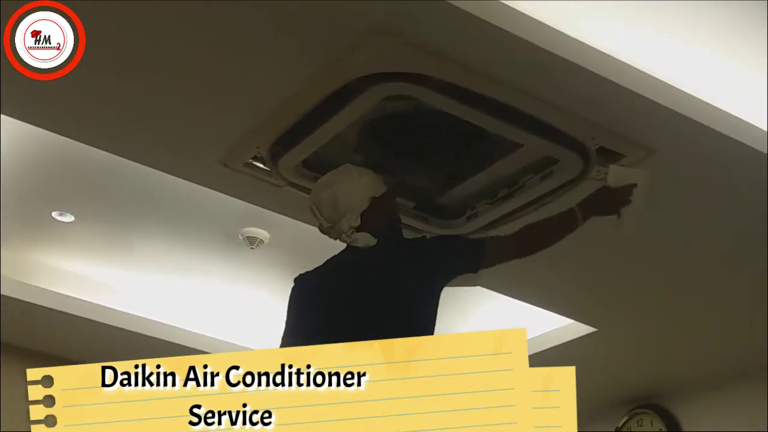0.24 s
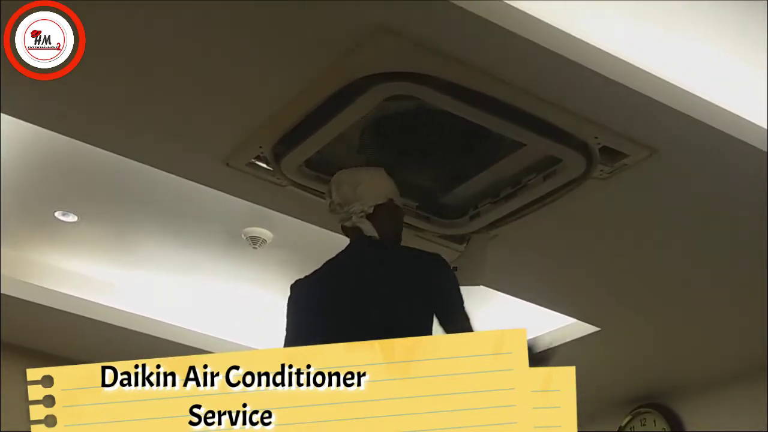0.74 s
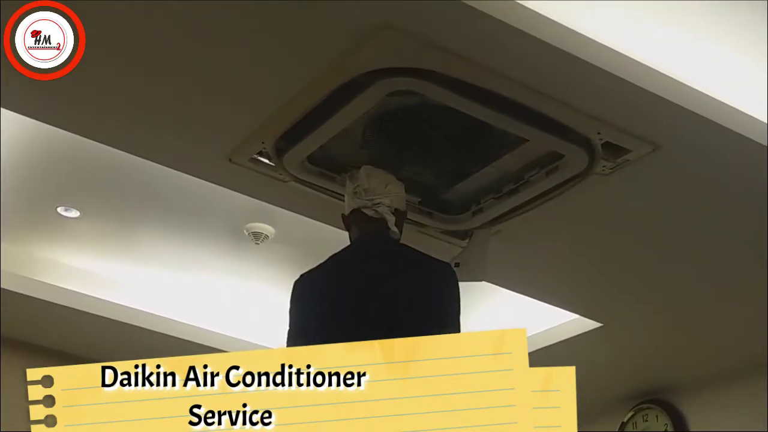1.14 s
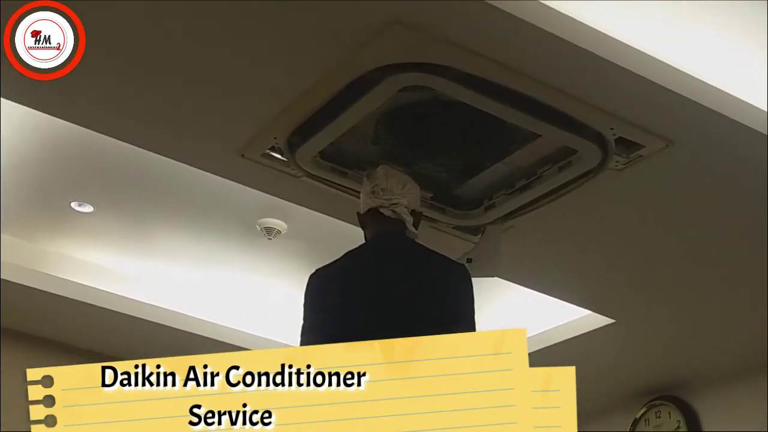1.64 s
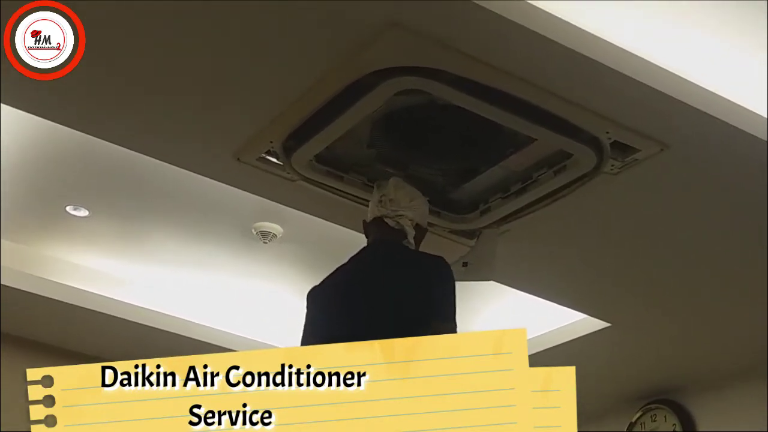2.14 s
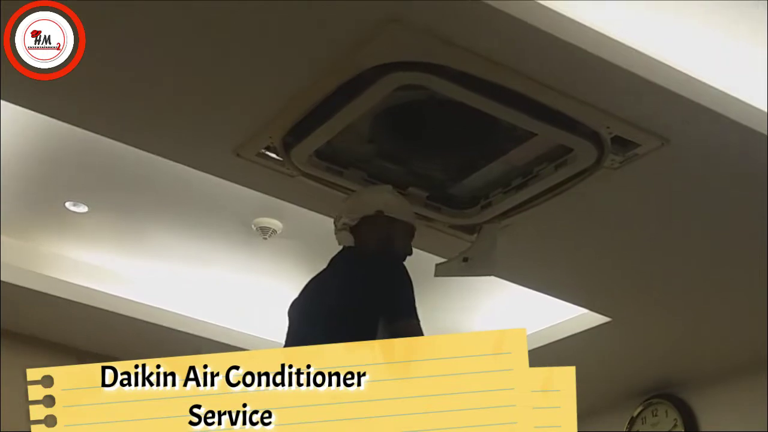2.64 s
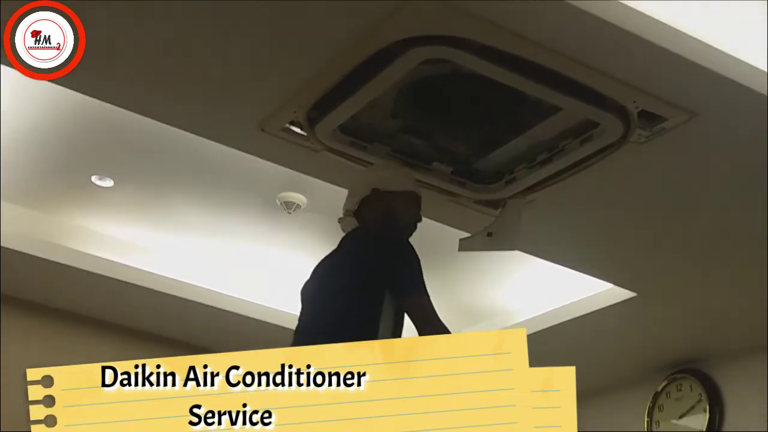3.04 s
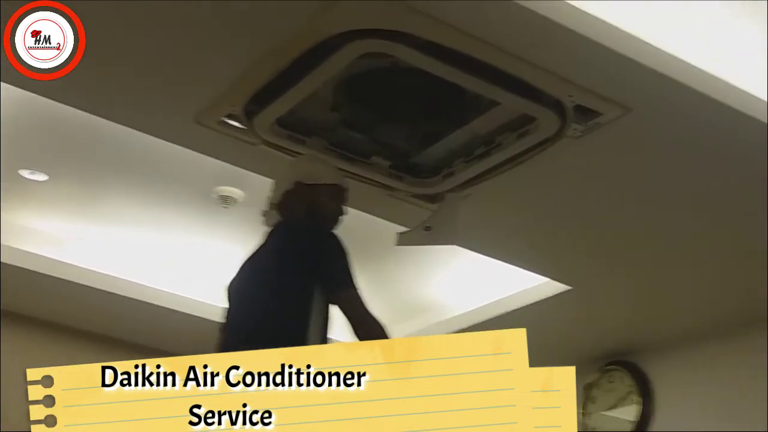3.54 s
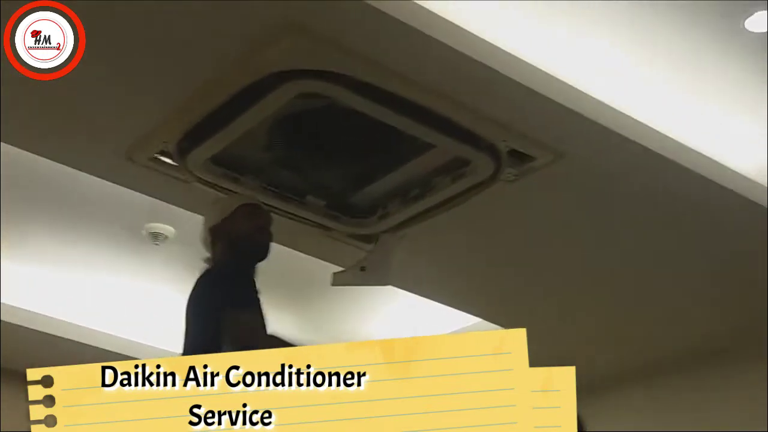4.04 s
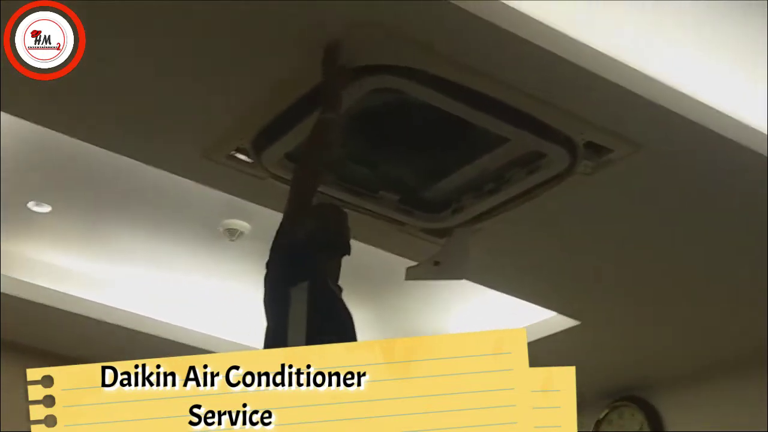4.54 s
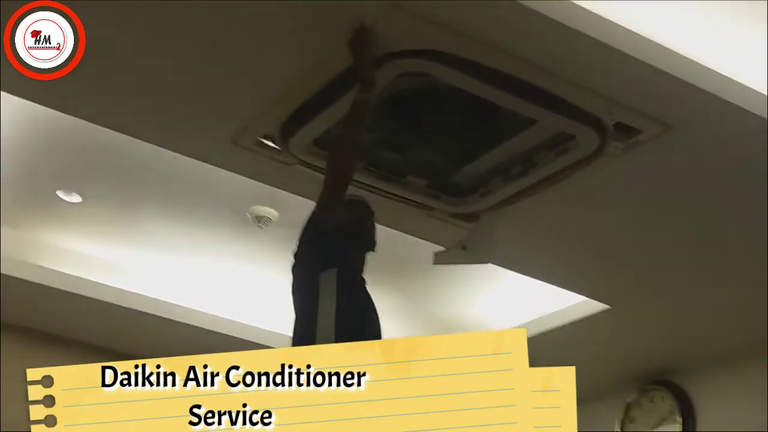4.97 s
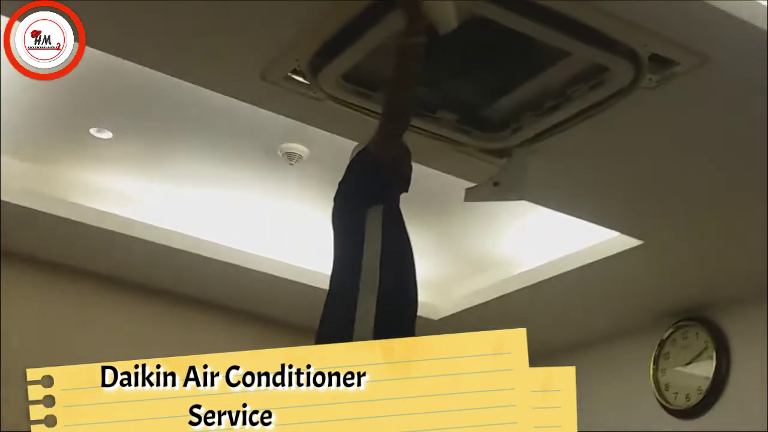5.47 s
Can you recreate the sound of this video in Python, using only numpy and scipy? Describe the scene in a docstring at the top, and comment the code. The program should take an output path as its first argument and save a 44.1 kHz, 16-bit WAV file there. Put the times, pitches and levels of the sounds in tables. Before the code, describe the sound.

In a small, hard, echoing room, a plastic cover snaps off a ceiling unit almost at once. It is handled with faint scrapes, light knocks and tiny squeaks, with dry ticks close to the microphone near the middle. Later, latches click and two strong hollow blows make the panel boom. Low, quiet room noise lies underneath, picked up by a small, slightly dull microphone.

```python
"""Plastic corner covers are prised off a ceiling air conditioner's panel in a small, hard room.
One cover snaps free and is rubbed, tapped and put down; then the next one's latches let go and the panel booms.
Blows are noise cracks plus ringing modes, sliding is shaped noise, and squeaks are unsteady sine tones.
Dry ticks and soft bumps come from right beside the microphone, over quiet room noise."""
import sys
import numpy as np
from scipy import signal
from scipy.fft import rfft, irfft, next_fast_len
from scipy.io import wavfile
from scipy.ndimage import uniform_filter1d

SR = 44100
rng = np.random.default_rng(int(sys.argv[2]) if len(sys.argv) > 2 else 0)


def dump_mix(stems):
    """Bounce the given channels to the path in sys.argv[1] as a 16-bit WAV at rate SR."""
    frames = np.atleast_2d(stems).T  # one column per channel
    limited = np.clip(frames, -1, 1)  # hard clip at full scale
    pcm = np.round(limited * 32767).astype(np.int16)
    wavfile.write(sys.argv[1], SR, pcm)


N = 251811
T = np.arange(N) / SR  # seconds into the scene
AGE = T[:SR]  # seconds since a blow, up to one


# Blows on the loose cover. Each row: start in seconds, level in dB, bass in dB,
# treble tilt in dB per octave, resonance in Hz, room level against the direct crack in dB.
COVER_HITS = [(.064, -12, 7, -8.5, 4500, -17), (.0964, 12.5, -5, 1, 3040, 1.5),
              (.0982, 17, 9.5, -4, 3650, 7), (1.238, -18.5, -7, -3.5, 5130, 7),
              (1.778, -9.5, 7, -4, 2100, 1.5), (2.288, -2, 3.5, -3, 4600, -2.5)]
# Colour of the cover's crack. Each row: frequency in Hz, gain in dB.
COVER_COLOUR = [(40, -36.5), (80, -11), (150, -10), (280, -6.5), (450, -8), (620, -8), (900, -5.5),
                (1700, -0.5), (2700, -4.5), (3400, -0.5), (5000, 0.5), (7000, -3.5), (15000, -6)]
# What the cover sends straight to the microphone, against its all-round sound.
# Each row: frequency in Hz, gain in dB.
COVER_BEAM = [(250, -22), (550, 7), (1500, -4.5), (3200, 3.5), (6500, 0)]
# Ringing modes of the cover. Each row: frequency in Hz, level in dB, t60 in seconds.
COVER_MODES = [(143.3, -11, .9), (159.3, -3, 0.81), (245.3, -6.5, 0.2), (300, -8.5, 0.43),
               (405.4, -2.5, 0.45), (610, -8.5, 0.33), (650, 9, .08), (1630, 1.5, 0.47), (2300, 2.5, 0.32),
               (3130, 3, .3), (3300, -6, .5), (3640, -19, .55), (3740, 3.5, 0.52), (3950, -2.5, .55),
               (4200, -0.5, .5), (4510, -6, .45), (5164, -4.5, 0.26), (5650, -15, .35)]


def cover_blows(crack_t60_s=0.035):
    """The loose cover snaps and knocks: a short crack, then ringing that swells in slowly."""
    return plastic(COVER_HITS, COVER_COLOUR, COVER_BEAM, COVER_MODES, crack_t60_s,
                   ring_db=-54.5, swell_s=0.026)


# Blows on the latches and their frame. Each row: start in seconds, level in dB, bass in dB,
# treble tilt in dB per octave, resonance in Hz, room level against the direct crack in dB.
LATCH_HITS = [(3.9098, -9, 0.5, -1, 2340, 3.5), (4.1638, -10.5, -25, 6, 2440, 2.5),
              (4.631, -21, 1, 1.5, 4970, -3), (4.7245, -13, 7.5, 1.5, 3500, -3),
              (4.876, -15, -1, 2, 2200, -1), (4.9115, 6.5, -19, -0.5, 2470, 0.5),
              (5.0095, 19, 2.5, 1.5, 1920, 0.5), (5.036, 9.5, 14.5, 6, 447, -9),
              (5.2178, 8, 9.5, 1, 2770, 4.5), (5.4234, 1.5, 0.5, 1.5, 1860, 5),
              (5.5213, 19.5, 1.5, 1.5, 2460, 2.5), (5.549, 11.5, 6, 7, 2970, -1)]
# Colour of the frame's crack. Each row: frequency in Hz, gain in dB.
FRAME_COLOUR = [(35, -12), (75, -8), (170, 5.5), (330, 0.5), (480, 0), (640, -5), (880, 1), (1250, -6),
                (1900, 2), (2800, -4), (4100, -7.5), (5400, -12), (7500, -9), (15000, -31)]
# What the frame sends straight to the microphone, against its all-round sound.
# Each row: frequency in Hz, gain in dB.
FRAME_BEAM = [(200, -9.5), (850, 4.5), (2500, 1), (3500, -1), (6500, 2.5)]
# Ringing modes of the frame. Each row: frequency in Hz, level in dB, t60 in seconds.
FRAME_MODES = [(84.3, 1, 0.36), (134, 6, 0.25), (269.5, 2.5, 0.28), (416.4, 1.5, 0.33), (449, -5, 0.42),
               (190.3, 6.5, 0.25), (860, -14, 0.41), (807, -5, 0.15), (1400, -16, 0.05), (2396, 15, 0.045),
               (1200, -16, 0.15), (1310, 0, 0.35), (1477, -3, 0.39), (1690, 2, 0.2), (1790, -10, 0.47),
               (2000, 4, 0.16), (2060, -1, 0.43), (2300, 9, 0.24), (2384, 9, 0.057), (2657, -3.5, 0.52),
               (3015, -7.5, 0.19), (3120, 3, 0.33), (4230, -19, 0.13)]


def latch_blows(crack_t60_s=0.073):
    """Latches let go and the frame booms: a longer crack, with ringing that swells in quickly."""
    return plastic(LATCH_HITS, FRAME_COLOUR, FRAME_BEAM, FRAME_MODES, crack_t60_s,
                   ring_db=-53, swell_s=0.0048)


def plastic(hits, body, beam, modes, crack_t60_s, ring_db, swell_s):
    """Each blow cracks through the moulding, sets modes ringing and reaches the walls by its own paths."""
    # bending waves take a moment to fill the part
    swell = undb(ring_db) * (1 - np.exp(-AGE / swell_s))
    out = np.zeros(N)
    for start_s, db, bass_db, tilt_db, centre_hz, room_db in hits:
        direct = colour(crack(crack_t60_s), beam)
        reflected = undb(room_db) * room()
        snap = colour(direct + reflected, body)
        blow = colour(snap + swell * ring(modes), contact(bass_db, tilt_db, centre_hz))
        add(out, start_s, undb(db) * blow)
    return out


def crack(t60):
    """A burst of dense, quickly damped modes, made from decaying noise."""
    return even(rng.standard_normal(SR) * fade(t60), size=1600)


def ring(modes, scatter_db=5.0):
    """Damped modes; every point of contact weights them differently."""
    out = np.zeros(SR)
    for hz, db, t60 in modes:
        level = undb(db + scatter_db * rng.standard_normal())
        turn = rng.standard_normal()  # starting phase in cycles
        out += level * np.sin(2 * np.pi * (hz * AGE + turn)) * fade(t60)
    return out


def contact(bass_db, tilt_db, centre_hz, lift_db=4.5, low_hz=220, mid_hz=900, knee_hz=2200, width=0.4):
    """Colour of a blow: heavy has more bass, sharp more treble; the struck spot has a broad resonance."""
    hz = np.geomspace(40, SR / 2, num=40)
    bass = read([(low_hz, bass_db), (mid_hz, 0)], hz)
    treble = tilt_db * np.log2(np.maximum(hz / knee_hz, 1))
    return np.c_[hz, bass + treble + lift_db * hump(hz, centre_hz, width)]


# Colour of the sliding plastic. Each row: frequency in Hz, gain in dB.
SLIDE_COLOUR = [(80, -6.5), (220, -6.5), (340, 9.5), (480, -2), (780, 0.5), (1200, -1.5), (2100, -1),
                (2900, -2), (3800, -3.5), (5600, -3), (8000, -5.5), (15000, -13)]


def rubbing(grain_db=1.0, knee_hz=3000, lift_db=6.0, width=0.52):
    """Dense tiny slips; faster sliding is louder, and the resonance moves with the point of contact."""
    db, tilt_db, centre_hz = sliding()
    slips = rng.standard_normal(N) * undb(grain_db * walk(500))
    slips = colour(slips / np.std(slips), SLIDE_COLOUR)
    out = np.zeros(N)
    for hz, band in octaves(slips, count=16):
        tilt = tilt_db * np.log2(max(hz / knee_hz, .25))  # held beyond two octaves below the knee
        resonance = lift_db * hump(hz, centre_hz, width)
        out += band * undb(db + tilt + resonance)
    return out


# Strokes of plastic sliding under the hands. Each row: start in seconds, length in seconds, level in dB,
# treble tilt in dB per octave, resonance in Hz, glide of that resonance in octaves.
STROKES = [(-.03, 0.058, -43, -2.5, 600, -0.047), (0.023, 0.041, -48, 3.5, 700, 0),
           (1.18, 0.043, -51, 1, 4480, 0), (1.223, 0.037, -44, 0, 5580, -0.18),
           (1.34, 0.45, -56, -2, 4400, 0.17), (1.428, .07, -55, -0.5, 5000, 0.099),
           (1.687, 0.12, -51, 4.5, 4600, 0), (1.74, 0.07, -38.5, -2, 2100, 0.37),
           (1.88, .066, -47, 1.5, 5200, -0.044), (2.092, 0.22, -43, 1, 5000, -0.26),
           (2.3, 0.064, -44, -3, 890, -0.055), (2.426, 0.07, -51, 0, 5000, -0.25),
           (2.683, 0.059, -46, -.5, 5500, -0.42), (2.772, 0.05, -42, -3.5, 2400, 0),
           (2.846, 0.072, -49.5, -1.5, 5000, 0.24), (2.95, 0.032, -45.5, -1, 3000, -0.085),
           (3.018, 0.11, -49.5, -0.5, 2900, -0.16), (3.143, .07, -40.5, 2, 3700, -0.26),
           (3.216, 0.047, -39, 0, 2420, -0.21), (3.3, 0.24, -63, -3, 1960, 0),
           (4.073, 0.082, -49, -.5, 2320, -0.33), (4.192, 0.24, -57, -1, 2400, -0.77),
           (4.702, 0.12, -52, -3, 702, 0.08)]
# Hands resting on the plastic between strokes. Each row: time in seconds, level in dB.
GRIP = [(.5, -73), (1.1, -69.5), (2.6, -61), (3.8, -68), (4.3, -60.5), (5.7, -57)]


def sliding(grip_tilt_db=-6.5, grip_hz=2800):
    """Level, tilt and resonance: powers of grip and strokes add up, and the strongest rules the colour."""
    power = undb(np.interp(T, *np.transpose(GRIP))) ** 2
    tilt = power * grip_tilt_db
    centre = power * grip_hz
    for start_s, length_s, db, tilt_db, hz, glide in STROKES:
        share = (undb(db) * stroke(start_s, length_s)) ** 2
        moved = 2 ** (glide * np.clip((T - start_s) / length_s, 0, 1))
        power = power + share
        tilt = tilt + share * tilt_db
        centre = centre + share * hz * moved
    return 10 * np.log10(power), tilt / power, centre / power


def stroke(start_s, length_s, attack_s=.03, release_s=0.024):
    """Sliding speed of one stroke: it picks up, holds and dies away."""
    since = T - start_s
    pick_up = np.clip(since / attack_s, 0, 1)
    return pick_up * np.exp(-np.clip((since - length_s) / release_s, 0, 20))


# The sliding catches and squeaks. Each row: peak time in seconds, pitch in Hz, level in dB,
# half length in seconds.
SQUEAKS = [(1.266, 1730, -55, 0.05), (1.854, 2104, -50.5, 0.018), (3.073, 1585, -48, 0.027)]


def squeaks(waver=0.0225, rough_db=3, drop_share=0.07, settle_s=0.0061):
    """Brief stick-slip tones that drop onto their pitch, unsteady in pitch and strength."""
    out = np.zeros(N)
    for peak_s, hz, db, half_s in SQUEAKS:
        # the pitch starts a share too high; its fall is centred one half length before the peak
        drop = drop_share * (1 - np.tanh((T - peak_s + half_s) / settle_s)) / 2
        pitch = hz * (1 + drop + waver * walk(250))
        phase = 2 * np.pi * np.cumsum(pitch) / SR
        swell = np.exp(-((T - peak_s) / half_s) ** 2)
        out += undb(db + rough_db * walk(180)) * swell * np.sin(phase)
    return out


# Dry ticks beside the microphone. Each row: start in seconds, level in dB,
# treble tilt in dB per octave, resonance in Hz.
TICKS = [(1.524, -26, -7, 1800), (2.353, -18, -15, 1700), (2.7714, -7.5, -4, 4500), (2.777, -12, -5, 2500),
         (2.782, -13, -6, 2300), (2.79, -11.5, -7, 2500), (2.8174, -10.5, -15, 1180),
         (2.998, -14.5, 0.5, 2860), (4.603, -24.5, -3.5, 3000)]
# Colour of the ticks. Each row: frequency in Hz, gain in dB.
TICK_COLOUR = [(100, -3), (900, 0.5), (2500, 1.5), (5000, 2.5), (8000, -4), (15000, -20)]
# Soft bumps beside the microphone. Each row: start in seconds, level in dB, pitch in Hz, t60 in seconds.
BUMPS = [(2.806, -26, 157, 0.034), (2.8201, -28.5, 192, 0.016), (2.979, -40, 170, 0.029)]
# Colour of the bumps. Each row: frequency in Hz, gain in dB.
BUMP_COLOUR = [(150, 0.5), (700, 2.5), (3500, 2.3)]


def handling(tick_t60=0.012):
    """Ticks of noise and bumps of damped low tone, so close that the room adds nothing."""
    out = np.zeros(N)
    for start_s, db, tilt_db, centre_hz in TICKS:
        tick = colour(crack(tick_t60), TICK_COLOUR)
        add(out, start_s, undb(db) * colour(tick, contact(0, tilt_db, centre_hz)))
    for start_s, db, hz, t60 in BUMPS:
        bump = np.cos(2 * np.pi * hz * AGE) * fade(t60)
        add(out, start_s, undb(db) * colour(bump, BUMP_COLOUR))
    return out


# Decay of the small, hard room. Each row: frequency in Hz, t60 in seconds.
ROOM_T60 = [(100, 0.57), (200, .72), (400, 0.66), (1200, 0.47), (2600, .47), (4000, 0.5), (6300, 0.44),
            (14000, 0.3)]


def room(build_s=0.0023, gap_s=0.009, late_hz=350):
    """Dense reflections arrive after a short gap and build up, the bass more slowly than the treble."""
    since = np.maximum(AGE - gap_s, 0)
    tail = np.zeros(SR)
    for hz, band in octaves(rng.standard_normal(SR), count=14):
        build = 1 - np.exp(-since / (build_s * (1 + late_hz / hz)))
        tail += band * fade(read(ROOM_T60, hz)) * build
    return even(tail, size=320)


# Colour of the quiet room noise. Each row: frequency in Hz, level in dB.
AIR_COLOUR = [(22, -64.5), (40, -31), (65, -38), (160, -33.5), (270, -41), (420, -45), (1000, -53.5),
              (2200, -61.5), (5000, -65), (15000, -62.5)]


def air():
    """Low room noise from filtered noise; its level wavers a little, least in the treble."""
    out = np.zeros(N)
    for hz, band in octaves(colour(rng.standard_normal(N), AIR_COLOUR)):
        waver_db = min(1.5, 600 / hz)
        out += band * undb(waver_db * walk(6))
    return out


def undb(db):
    """Decibels to gain."""
    return 10 ** (np.asarray(db) / 20)


def unit(x):
    """Scale to an energy of one."""
    return x / np.sqrt(np.sum(x ** 2))


def fade(t60):
    """One second of exponential decay, falling 60 dB in t60 seconds."""
    return np.exp(-np.log(1000) * AGE / max(t60, 1e-3))


def hump(hz, centre_hz, width):
    """A bell on the octave axis, one at its centre."""
    return np.exp(-(np.log2(hz / centre_hz) / width) ** 2)


def read(points, hz):
    """Join (Hz, value) points on a log-frequency axis."""
    f, value = np.transpose(points)
    return np.interp(np.log(np.maximum(hz, 1)), np.log(f), value)


def colour(x, points, order=4096):
    """Causal minimum-phase filter with the given (Hz, dB) response."""
    gain = undb(read(points, np.fft.rfftfreq(order, 1 / SR)))
    cepstrum = irfft(np.log(gain))
    # folding the cepstrum forward puts the energy as early as possible
    cepstrum[1:order // 2] *= 2
    cepstrum[order // 2 + 1:] = 0
    impulse = irfft(np.exp(rfft(cepstrum)))
    return signal.fftconvolve(x, impulse)[:len(x)]


def octaves(x, count=10):
    """Split into overlapping bands, evenly spaced in octaves, that add up to the whole: (centre Hz, band)."""
    centres = np.geomspace(50, 15000, count)
    size = next_fast_len(len(x), True)
    spectrum, hz = rfft(x, size), np.fft.rfftfreq(size, 1 / SR)
    bands = []
    for centre in centres:
        weight = read(np.c_[centres, centres == centre], hz)
        bands.append((centre, irfft(spectrum * weight, size)[:len(x)]))
    return bands


def even(x, size):
    """Spread a decaying sound's energy evenly over frequency; detail narrower than size Hz stays."""
    spectrum = rfft(x)
    smooth_power = uniform_filter1d(abs(spectrum) ** 2, size)
    flat = irfft(spectrum / np.sqrt(smooth_power), SR)
    return unit(flat * (AGE < .8))


def walk(rate):
    """Slow chance with a spread near one: random knots, rate per second, joined by lines."""
    knots = rng.standard_normal(N // 100)  # the last knot holds if they run out
    return np.interp(T * rate, np.arange(len(knots)), knots)


def add(track, s, sound):
    """Mix a sound in at time s."""
    start = max(int(s * SR), 0)
    part = sound[:max(N - start, 0)]
    track[start:start + len(part)] += part


def scene():
    """Work at the ceiling with its room, close handling and room noise, in one channel."""
    blows = cover_blows() + latch_blows()
    friction = rubbing() + squeaks()
    walls = signal.fftconvolve(friction, room())[:N]
    mix = blows + undb(-1.0) * friction + undb(-7.0) * walls + handling() + air()
    return mix[None]


# Response of the small microphone. Each row: frequency in Hz, gain in dB.
MICROPHONE = [(25, -13.5), (55, 2), (5200, 0.5), (6400, -2.5), (7800, -15), (10000, -5.5), (13000, -6),
              (15500, -3.5)]


def record(dry, top_hz=15650):
    """A small microphone with a dip in the treble; a steep low-pass cuts the top."""
    heard = colour(dry[0], MICROPHONE)
    low_pass = signal.ellip(10, .2, 70, top_hz, fs=SR, output="sos")  # ripple and stop band in dB
    return signal.sosfilt(low_pass, heard)[None]


dry = scene()
out = record(dry)
dump_mix(out)
```